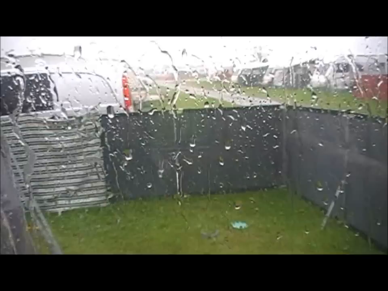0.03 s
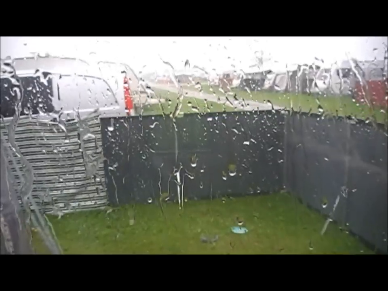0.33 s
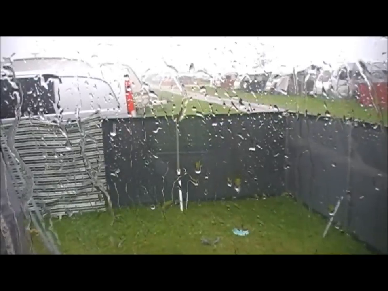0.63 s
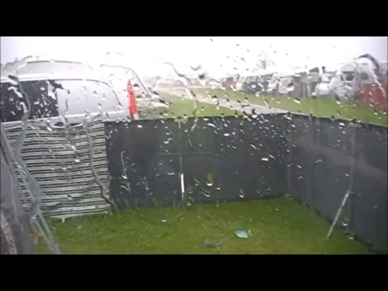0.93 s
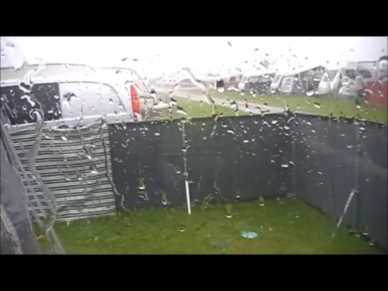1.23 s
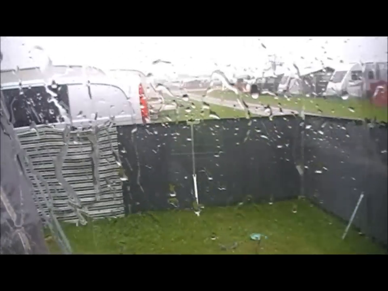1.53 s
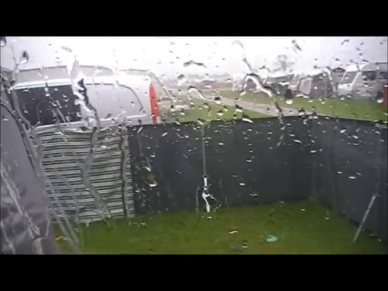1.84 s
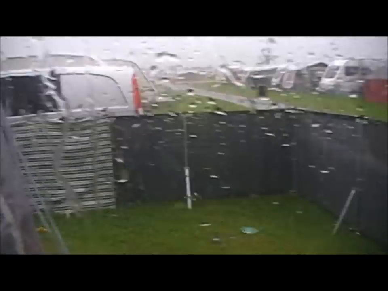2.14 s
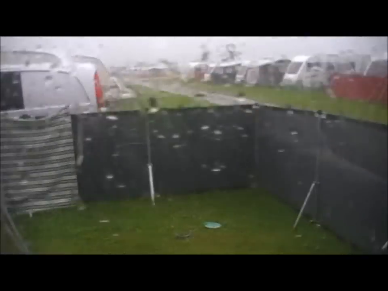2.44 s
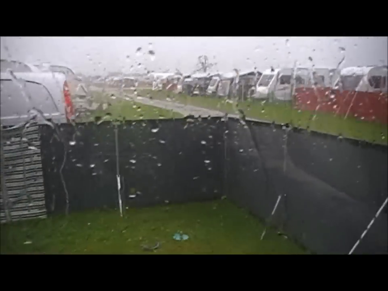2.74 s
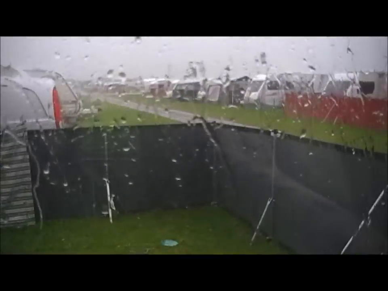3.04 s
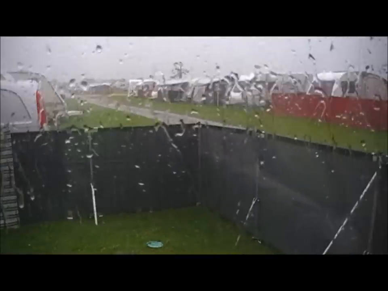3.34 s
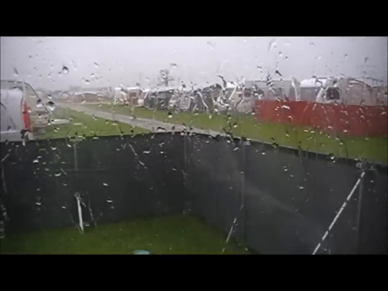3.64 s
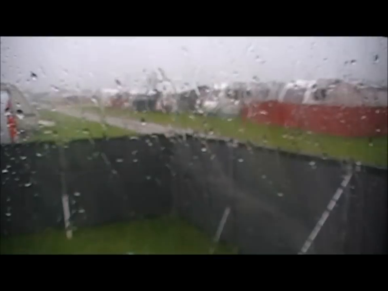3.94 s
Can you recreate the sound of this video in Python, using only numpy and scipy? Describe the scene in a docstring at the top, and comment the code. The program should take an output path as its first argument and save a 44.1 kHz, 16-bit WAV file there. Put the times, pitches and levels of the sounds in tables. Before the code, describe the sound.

Heavy rain drums on a caravan roof, with single drops pinging and ticking, heard from inside.

```python
"""Heavy rain on a caravan, heard from inside by a window.
It starts abruptly: thousands of drops drum on the roof, patter on the shell and ring a hard panel,
probably a roof vent, while fine spray hisses on the window. From then on, single heavy drops ping and
thud, and close ones tick or splash. Just after two seconds a drip plinks on the shell; a quick run of
pings follows. Near the end the drumming dips briefly and the hiss gets softer."""
import sys
import numpy as np
from scipy import signal
from scipy.fft import rfft, irfft
from scipy.io import wavfile

SR = 44100
rng = np.random.default_rng(int(sys.argv[2]) if len(sys.argv) > 2 else 0)


def unload_wav(signal):
    """Save mono or channel-first audio to the path in sys.argv[1] as 16-bit WAV at rate SR, clipped to [-1, 1]."""
    wavfile.write(
        sys.argv[1],
        SR,
        np.round(np.clip(np.atleast_2d(signal).T, -1, 1) * 32767).astype(np.int16),
    )


N = 176400  # samples: four seconds

# How hard the rain falls on each surface. Each row: time in seconds, relative level in dB.
ROOF_DRUM_LEVEL = [(0.05, -24), (0.12, -26.5), (0.4, -25.5), (0.58, -25.5), (0.72, -27), (0.86, -26.5),
                   (1.43, -26), (1.6, -25.5), (1.95, -24), (2.22, -24.5), (2.34, -25), (2.6, -24.3),
                   (2.8, -26), (3.2, -25.5), (3.35, -26.5), (3.52, -30), (3.65, -27), (3.99, -25.5)]
ROOF_KNOCK_LEVEL = [(0.05, -32), (0.6, -31), (1.4, -30), (1.8, -28), (2.25, -28.3), (2.38, -31.5),
                    (2.7, -30), (3.1, -32), (3.5, -32), (3.99, -33)]
SHELL_LEVEL = [(0.05, -22.7), (0.48, -23), (0.55, -25.5), (0.84, -22.5), (0.91, -25.5), (1.05, -23.5),
               (1.34, -26), (1.48, -24.5), (2.56, -25), (2.63, -22.5), (3.13, -24.5), (3.2, -24),
               (3.27, -24.5), (3.42, -23.5), (3.56, -25), (3.78, -23.5), (3.85, -25), (3.99, -24.5)]
PANEL_LEVEL = [(0.05, -23.5), (0.12, -26.5), (0.34, -24.5), (0.69, -26), (0.84, -24.5), (0.96, -26.5),
               (1.05, -25), (1.14, -27), (1.29, -25), (1.37, -26.5), (1.9, -25.5), (2.01, -24),
               (2.07, -24.5), (2.16, -23.5), (2.36, -27.5), (2.56, -25.5), (2.65, -27), (2.77, -26),
               (3.13, -24.5), (3.63, -29), (3.7, -25.5), (3.78, -29), (3.99, -28)]
SPRAY_LEVEL = [(0.05, -38.5), (0.26, -41), (0.77, -42.5), (0.84, -41), (0.91, -43), (1.05, -41.5),
               (1.34, -43.5), (1.41, -42), (2.13, -41), (2.56, -42.5), (2.63, -41), (2.77, -42.5),
               (2.84, -42), (2.92, -43.5), (3.63, -44.5), (3.7, -44), (3.85, -45), (3.99, -45.5)]
# The tone of a drop on each surface. Each row: frequency in Hz, relative strength in dB.
ROOF_DRUM_TONE = [(15, -47), (26, -32), (50, -28), (72, -12), (100, -12.5), (140, -4.5), (185, 0.5),
                  (265, 0.8), (325, -4), (400, -5.5), (540, -15.5), (750, -24), (2000, -54)]
ROOF_KNOCK_TONE = [(150, -27), (300, -6), (370, 0.5), (445, 2), (520, -2), (620, -12.5), (900, -31),
                   (2500, -50.5)]
SHELL_TONE = [(200, -29), (420, -9.5), (600, -2), (800, 0.5), (950, -0.5), (1100, 1), (1400, -3),
              (1750, -5), (2250, -5), (2800, -5.5), (3500, -21), (5000, -29), (9000, -47)]
PANEL_TONE = [(1000, -38.5), (2000, -16.5), (2380, -9.5), (2590, -2), (2740, 0.7), (2890, -4.5),
              (3100, -11), (3400, -18), (4200, -30.5), (6000, -47), (12000, -67)]
SPRAY_TONE = [(1500, -41), (3500, 7.5), (5000, 1.5), (6300, 0.5), (8000, 0.5), (9200, 1), (10500, -3),
              (12400, -10), (14500, -26)]
SPLASH_TONE = [(2000, -14), (4000, 4.5), (6000, 0), (8700, 2.5), (11000, -8), (14500, -25)]
WINDOW_TONE = [(10500, 1), (12500, -7), (14500, -7)]
# Single heavy drops. Each row: start in seconds, level in dB, pitch in Hz.
PANEL_PINGS = [(.053, -9, 2695), (.095, -19, 2720), (.332, -10.5, 2670), (.345, -15, 2685),
               (.555, -12, 2600), (1.023, -14, 2750), (1.051, -16.5, 2660), (1.280, -18, 2710),
               (1.285, -15, 2740), (1.298, -16, 2750), (1.430, -18, 2820), (1.709, -13, 2700),
               (1.980, -17, 2630), (2.017, -16, 2500), (2.022, -14, 2280), (2.172, -16, 2740),
               (2.629, -14, 2720), (2.644, -14, 2650), (2.652, -11, 2630), (2.669, -17, 2670),
               (2.679, -17, 2740), (2.701, -13, 2730), (2.731, -13, 2690), (3.183, -19, 2620),
               (3.395, -14, 2650), (3.694, -18.5, 2660)]
ROOF_THUDS = [(.049, -18.5, 271), (.154, -20.5, 357), (1.040, -15, 261), (1.549, -17, 248),
              (1.619, -19, 280), (1.788, -17, 356), (2.019, -20, 260), (2.526, -17, 440), (2.613, -18, 284),
              (2.834, -19.5, 205), (2.917, -21, 239), (3.326, -18, 196)]
SHELL_DRIP = [(2.187, -17.5, 1220)]
# Drops on or near the window. Each row: start in seconds, level in dB, pitch in Hz,
# spread around that pitch in octaves, rise time in seconds.
WINDOW_TICKS = [(1.093, -27.5, 10000, 0.28, 0.00093), (1.108, -38, 9400, .1, .0012),
                (1.738, -35, 9800, 0.4, 0.0011), (1.820, -36, 7500, .45, .0014),
                (2.132, -37, 8000, .3, .0014), (2.144, -33, 9000, .35, .0017),
                (2.407, -29, 9200, 0.36, 0.0012), (2.454, -27.5, 8700, 0.11, .0009),
                (2.946, -36, 9000, .3, .0014), (3.391, -30.5, 8500, .6, 0.0011),
                (3.702, -42, 10500, .3, .002), (3.733, -41, 10800, .14, .0014)]
# Drops that burst into spray. Each row: start in seconds, level in dB, length in seconds.
SPLASHES = [(.108, -39, .016), (0.408, -37.5, 0.016), (0.553, -37, .022), (.668, -41, .014),
            (0.843, -38, 0.019), (0.991, -35.5, 0.04), (1.090, -43, 0.013), (1.43, -40, .016),
            (1.733, -38, .014), (2.402, -37, 0.026), (2.490, -40, .014), (2.616, -36, 0.015),
            (2.654, -31, 0.018), (3.011, -38, 0.02), (3.738, -37.5, 0.024)]
# How alike left and right sound. Each row: frequency in Hz, likeness from 0 to 1.
STEREO_LIKENESS = [(60, 1), (260, 1), (450, 0.97), (600, 0.86), (780, 0.94), (1150, 0.84), (1500, 0.81),
                   (2750, 0.78), (3600, 0.65), (6000, 0.63), (8000, 0.54), (10000, .22), (14000, .2)]
# How much louder the left side is. Each row: frequency in Hz, left minus right in dB.
LEFT_LOUDER = [(60, 5.5), (91, 1.5), (140, 3.5), (210, 2), (320, 3.5), (490, 1), (750, -0.5), (1140, 1.0),
               (1730, 2), (2630, 3.0), (4000, 2.5), (6090, 1.5), (9270, 0), (14100, 1.5)]
# How far the left wave runs ahead. Each row: frequency in Hz, lead in radians.
LEFT_LEAD = [(60, 0.089), (750, 0.15), (1300, 0.37), (3700, 0.2), (7000, 0.4), (8200, 0.55), (9800, 1.7),
             (14000, .5)]


def rain_on_caravan():
    """The broad roof drums and, higher in pitch, knocks; the shell patters; a small hard panel rings."""
    drum = shower(ROOF_DRUM_TONE, per_s=3000, spread_db=1.45, decay_s=0.0048, gust_db=0.5, gust_hz=25)
    knock = shower(ROOF_KNOCK_TONE, per_s=3000, spread_db=1.86, decay_s=0.0039, gust_db=0.5, gust_hz=25)
    patter = shower(SHELL_TONE, per_s=5500, spread_db=1.45, decay_s=0.0024, gust_db=0.57, gust_hz=30)
    ring = shower(PANEL_TONE, per_s=2200, spread_db=0.6, decay_s=0.0032, gust_db=-0.1, gust_hz=30)
    return (gain(-1.66) * level_curve(ROOF_DRUM_LEVEL) * drum
            + level_curve(ROOF_KNOCK_LEVEL) * knock
            + gain(0.92) * level_curve(SHELL_LEVEL) * patter
            + gain(-0.14) * level_curve(PANEL_LEVEL) * ring)


def shower(tone, per_s, spread_db, decay_s, gust_db, gust_hz, spots=48):
    """Drops of random size land on many spots of a surface; each spot answers in its own way."""
    size_db = spread_db * np.minimum(rng.exponential(1, N), 4)
    size_db += gust_db * flutter(gust_hz)  # a gust here is a brief clump of louder drops
    lands = rng.random(N) < per_s / SR
    drops = gain(size_db) * lands * rng.choice([-1, 1], N)
    spot = rng.integers(0, spots, N)
    hits = sum(excite((drops * (spot == k))[None], shiver(decay_s)) for k in range(spots))
    return unit_level(excite(hits, surface_ring(tone)))


def heavy_drops():
    """Single heavy drops ping on the panel, thud on the roof or plink on the shell."""
    pings = strikes(PANEL_PINGS, rise_s=0.0015, tone=PANEL_TONE, shiver_db=-20.5)
    thuds = strikes(ROOF_THUDS, rise_s=0.0047, tone=ROOF_DRUM_TONE, shiver_db=-16)
    drip = strikes(SHELL_DRIP, rise_s=0.0037, tone=SHELL_TONE, shiver_db=-20)
    return pings + thuds + drip


def strikes(drops, rise_s, tone, shiver_db):
    """Each drop rings one spot at its own pitch and makes the rest of the surface shiver."""
    out = np.zeros((2, N))
    outline = impact_outline(rise_s)
    t = np.arange(len(outline)) / SR
    for start_s, db, hz in drops:
        note = outline * np.sin(2 * np.pi * (hz * t + rng.random((2, 1))))
        shake = excite(outline * rng.standard_normal(note.shape), surface_ring(tone))
        add(out, start_s, gain(db) * (note + gain(shiver_db) * shake))
    return out


def window_spray():
    """Fine droplets hiss on the window; fewer, larger ones spatter."""
    hiss = shower(SPRAY_TONE, per_s=4000, spread_db=2.0, decay_s=0.0031, gust_db=1.06, gust_hz=35)
    spatter = shower(SPLASH_TONE, per_s=90, spread_db=1.5, decay_s=0.012, gust_db=1.5, gust_hz=12,
                     spots=12)
    return level_curve(SPRAY_LEVEL) * (gain(1.7) * hiss + gain(-7.0) * spatter)


def window_ticks():
    """Close drops tick on the window: tiny bursts of noise, each around its own pitch."""
    out = np.zeros((2, N))
    hz = np.geomspace(200, 16000, 200)
    for start_s, db, pitch_hz, octaves, rise_s in WINDOW_TICKS:
        peak_db = -20 * np.log10(1 + (np.log2(hz / pitch_hz) / octaves) ** 2)
        tone = np.c_[hz, peak_db + look_up(WINDOW_TONE, hz)]
        outline = impact_outline(rise_s)
        tap = outline * rng.standard_normal((2, len(outline)))
        add(out, start_s, gain(db) * signal.fftconvolve(tap, surface_ring(tone), axes=1))
    return out


def splashes():
    """A big drop breaks up, and its droplets land in a short swell."""
    out = np.zeros((2, N))
    t = np.arange(SR // 10) / SR
    for start_s, db, length_s in SPLASHES:
        swell = np.sin(np.pi * np.minimum(t / length_s, 1))
        droplets = swell * rng.standard_normal((2, len(t)))
        add(out, start_s, gain(db) * signal.fftconvolve(droplets, surface_ring(SPLASH_TONE), axes=1))
    return out


def microphones(paths):
    """Two close microphones hear the bass alike and the treble more and more apart."""
    hz = np.fft.rfftfreq(N, 1 / SR)
    left, other = rfft(paths)
    alike = np.clip(look_up(STEREO_LIKENESS, hz), 0, 0.999)
    lag = np.exp(-1j * look_up(LEFT_LEAD, hz))
    right = (alike * left + np.sqrt(1 - alike ** 2) * other) * lag
    lean = gain(look_up(LEFT_LOUDER, hz) / 2)
    return irfft(np.array([left * lean, right / lean]), N)


def surface_ring(tone, size=8192):
    """How a surface with this tone rings after one sharp tap, scaled to energy 1."""
    hz = abs(np.fft.fftfreq(size, 1 / SR))
    log_gain = np.log(gain(look_up(tone, hz)))
    spectrum = np.exp(np.conj(signal.hilbert(log_gain)))  # puts all the ringing after the tap
    ring = np.fft.ifft(spectrum).real[:size // 2]
    return ring[None] / np.linalg.norm(ring)


def shiver(decay_s, size=2048):
    """One impact: sudden, quickly dying noise, by two paths to the microphones."""
    fade = np.exp(-np.arange(size) / SR / decay_s)
    noise = rng.standard_normal((2, size)) * fade
    return noise * np.linalg.norm(fade) / np.linalg.norm(noise, axis=1, keepdims=True)


def impact_outline(rise_s, size=3000):
    """The loudness of one impact: a quick rise to 1, then a slower fall."""
    age = np.arange(size) / SR / rise_s
    return age * np.exp(1 - age)


def flutter(rate_hz):
    """A random wobble, mostly slower than the given rate."""
    hz = np.fft.rfftfreq(N, 1 / SR)
    noise = rfft(rng.standard_normal(N))
    return unit_level(irfft(noise * hz / (hz + 2) / (1 + (hz / rate_hz) ** 2), N))


def excite(taps, ring):
    """Every tap sets off a copy of the ring; the length stays the same."""
    return signal.oaconvolve(taps, ring, axes=1)[:, :taps.shape[1]]


def gain(db):
    """Turns decibels into a multiplier."""
    return 10 ** (np.asarray(db) / 20)


def unit_level(x):
    """Scales a sound to an average (rms) level of 1."""
    return x / np.sqrt(np.mean(x ** 2) + 1e-20)


def look_up(table, hz):
    """Reads between a table's rows, on a scale of octaves."""
    row_hz, values = np.transpose(table)
    return np.interp(np.log(hz + 1), np.log(row_hz + 1), values)


def level_curve(table):
    """Turns a level table into a multiplier for each sample."""
    return gain(np.interp(np.arange(N) / SR, *np.transpose(table)))


def add(mix, start_s, sound):
    """Mixes a sound in at its start time."""
    part = mix[:, round(start_s * SR):][:, :sound.shape[1]]
    part += sound[:, :part.shape[1]]


def scene():
    """All the rain, heard from inside."""
    return microphones(rain_on_caravan() + heavy_drops() + window_spray() + window_ticks() + splashes())


def record(dry):
    """The sound starts abruptly, and its highest treble is cut off."""
    start_s, fade_in_s, cutoff_hz = 0.041, 0.0022, 14400
    fade_in = np.clip((np.arange(N) / SR - start_s) / fade_in_s, 0, 1)
    treble_cut = signal.firwin(511, cutoff_hz, window=("kaiser", 9), fs=SR)
    return signal.oaconvolve(dry * fade_in, treble_cut[None], "same")


dry = scene()
out = record(dry)
unload_wav(out)
```